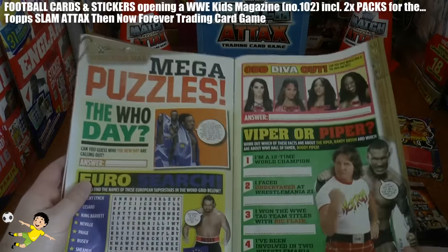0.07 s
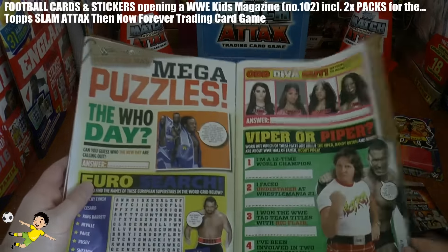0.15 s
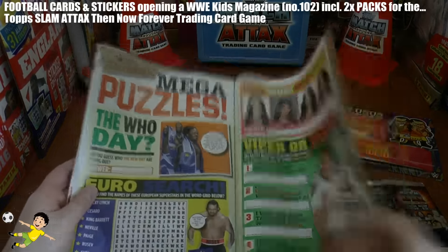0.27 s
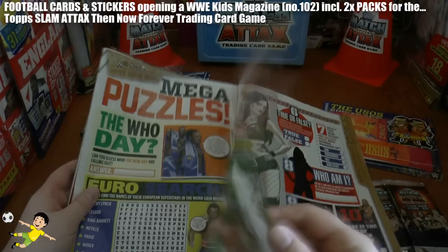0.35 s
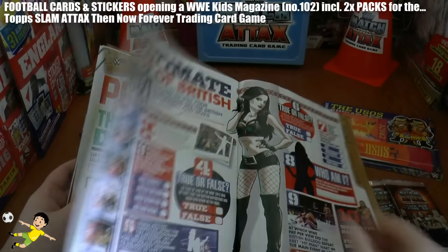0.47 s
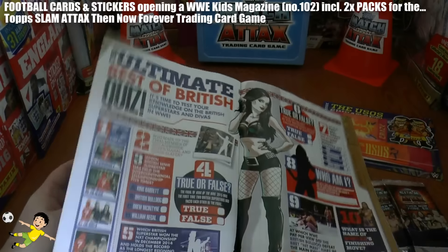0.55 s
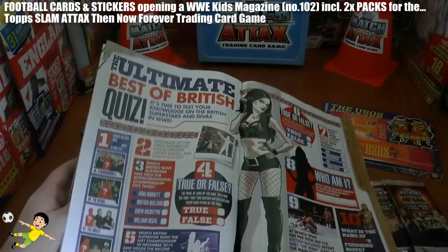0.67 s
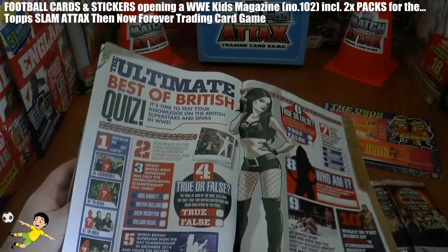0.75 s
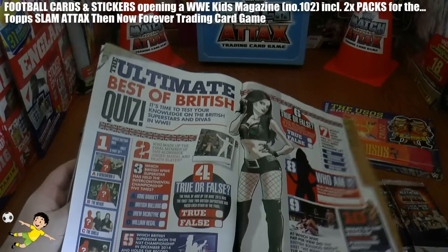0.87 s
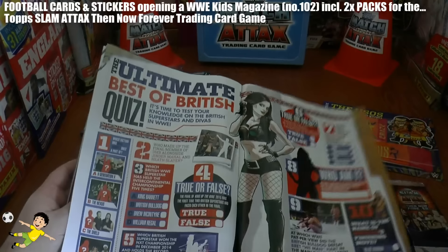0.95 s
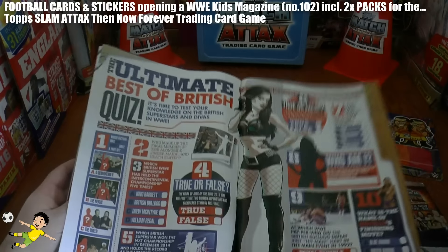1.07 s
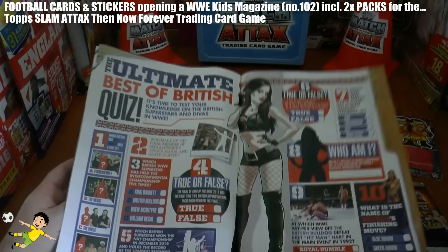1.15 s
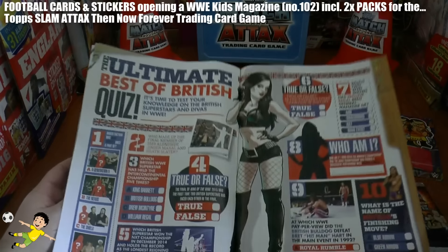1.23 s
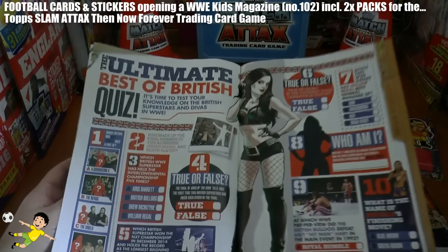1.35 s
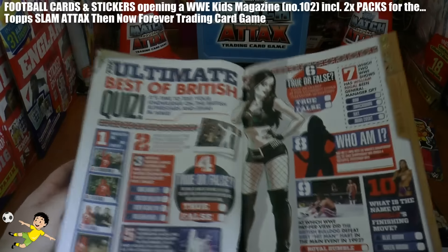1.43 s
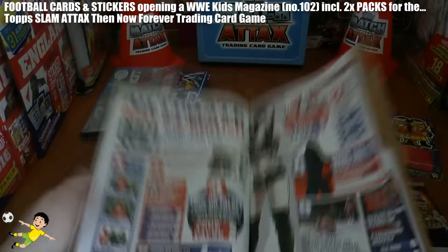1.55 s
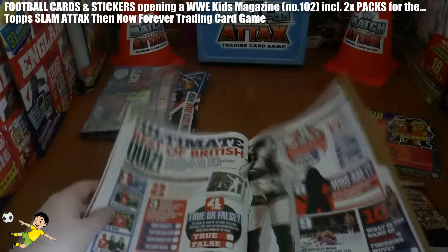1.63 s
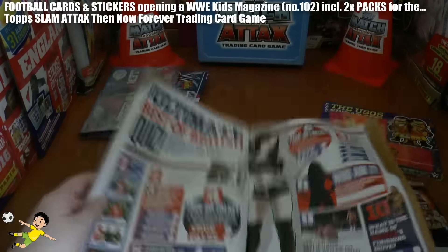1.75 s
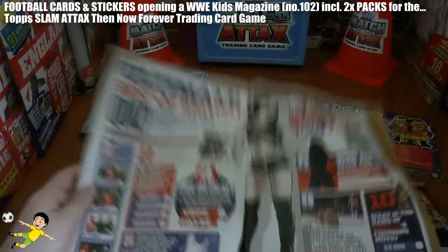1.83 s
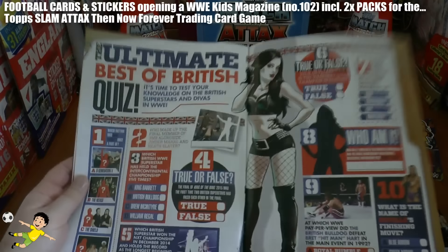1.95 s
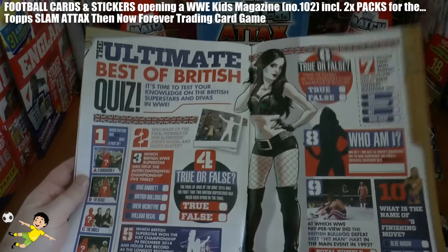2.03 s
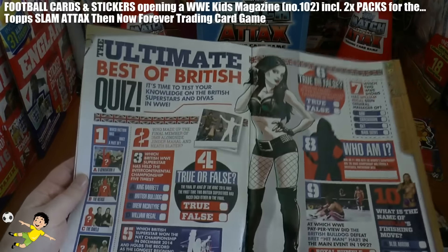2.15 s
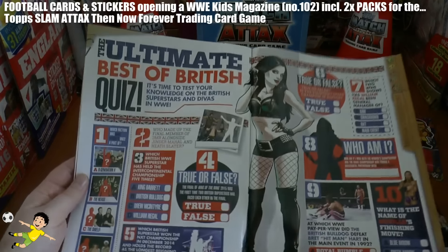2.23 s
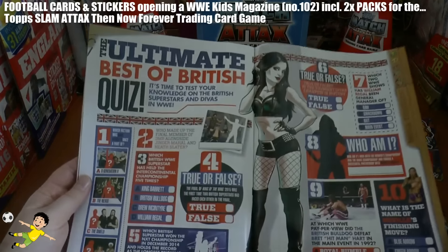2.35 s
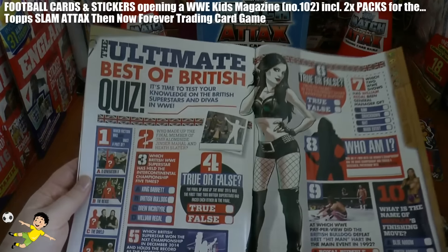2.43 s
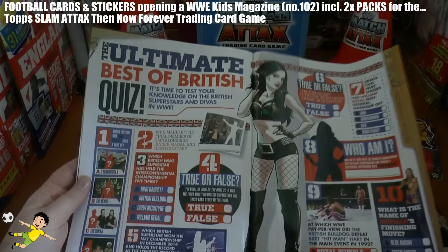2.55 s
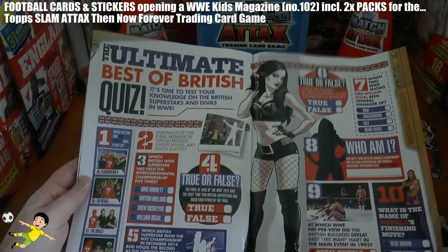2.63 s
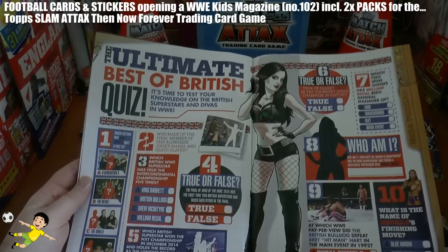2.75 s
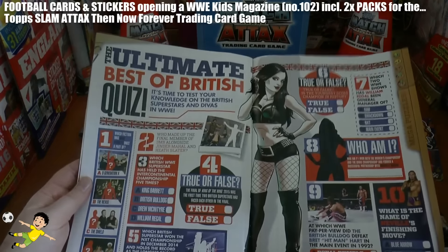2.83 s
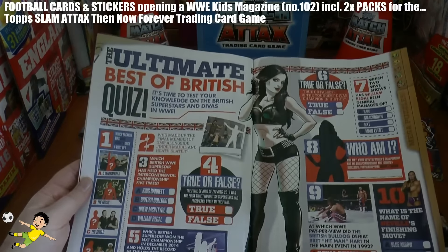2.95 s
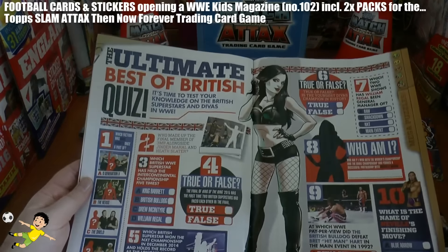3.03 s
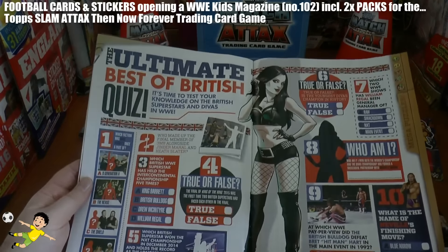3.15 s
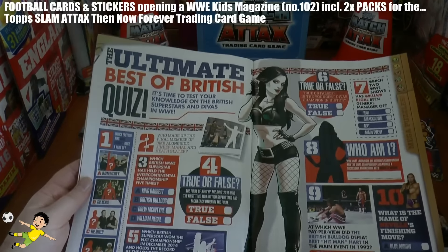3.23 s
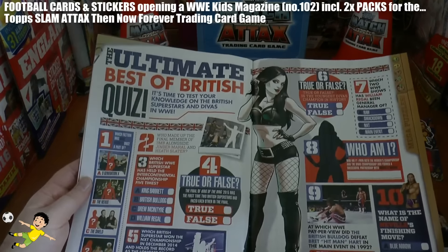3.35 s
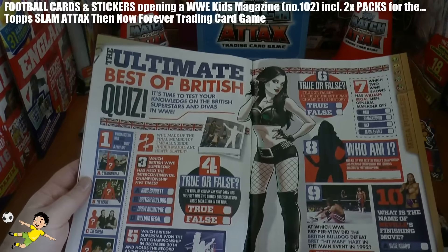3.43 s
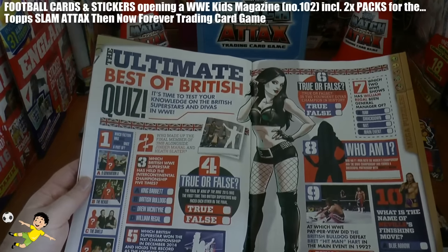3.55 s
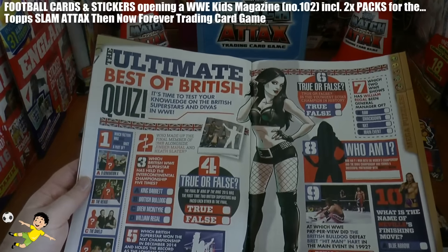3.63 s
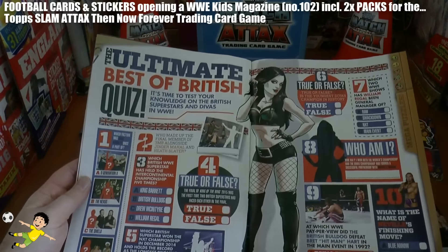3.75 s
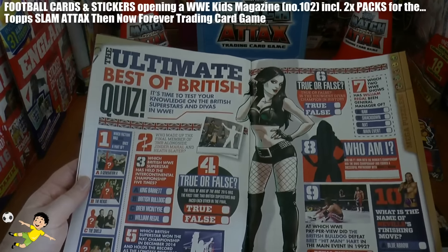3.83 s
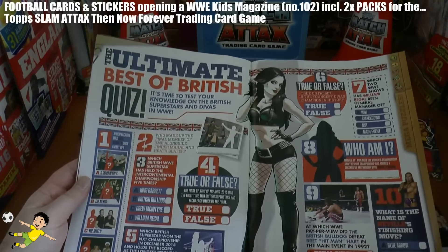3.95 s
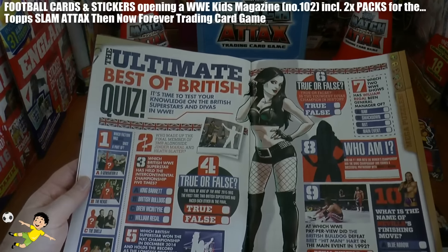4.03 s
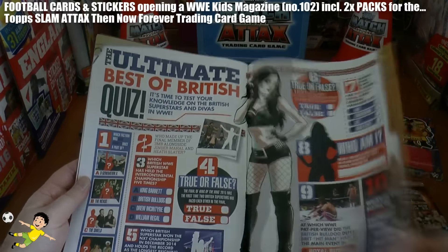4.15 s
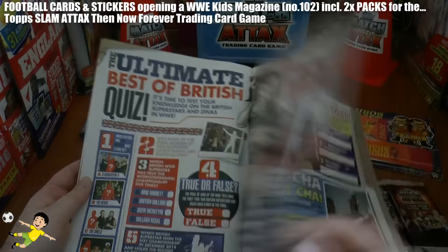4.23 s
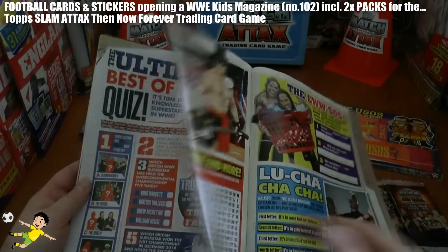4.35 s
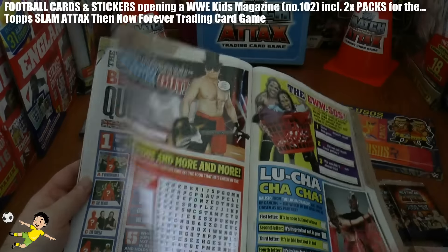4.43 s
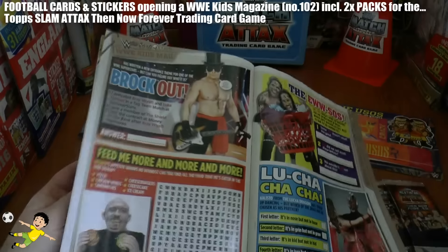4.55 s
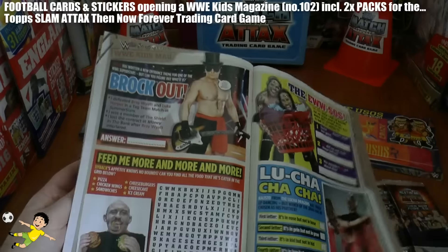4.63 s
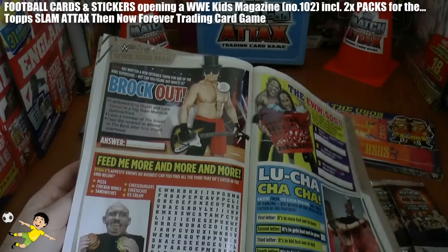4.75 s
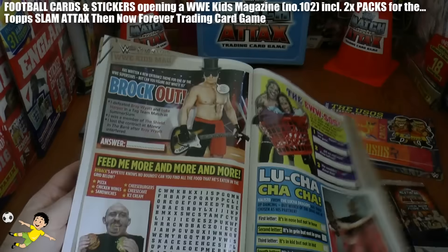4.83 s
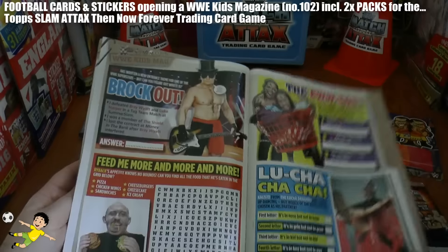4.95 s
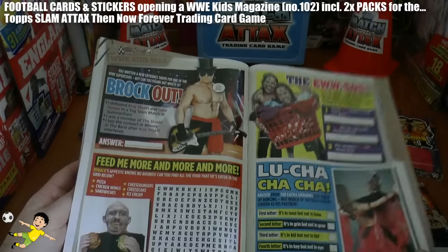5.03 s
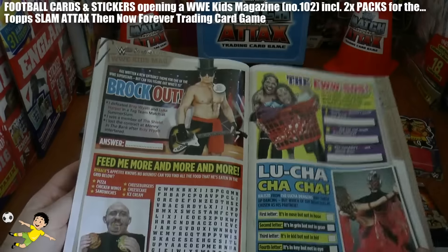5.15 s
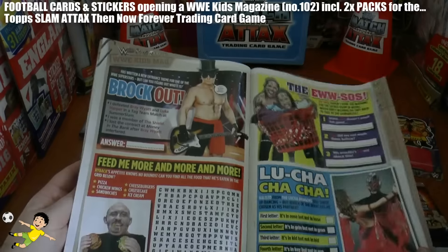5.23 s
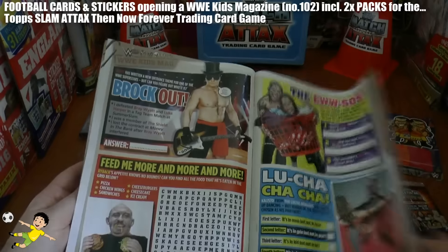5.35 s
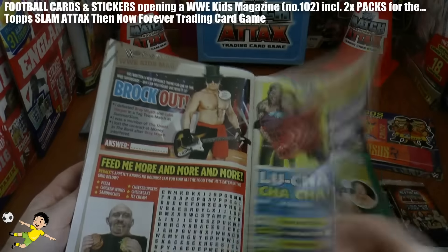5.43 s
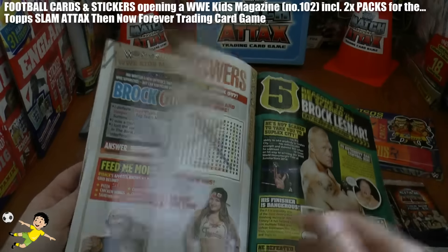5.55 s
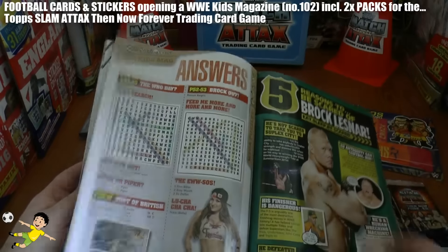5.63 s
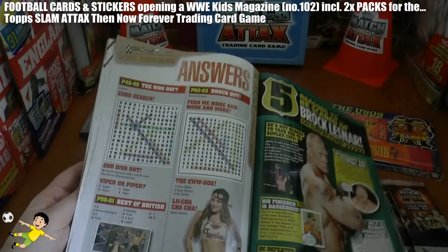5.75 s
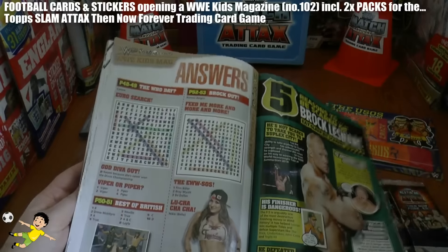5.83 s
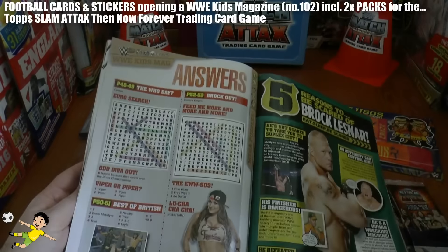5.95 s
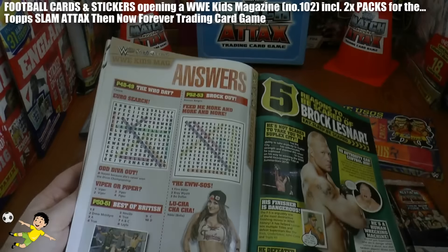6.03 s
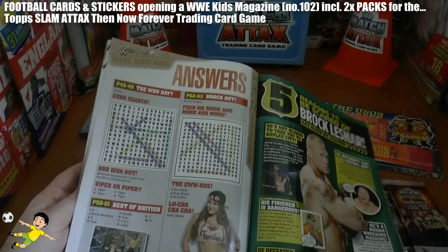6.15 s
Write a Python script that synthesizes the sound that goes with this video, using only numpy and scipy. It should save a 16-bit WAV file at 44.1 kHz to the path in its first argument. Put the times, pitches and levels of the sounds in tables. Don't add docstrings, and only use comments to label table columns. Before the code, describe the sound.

Close paper handling in a small quiet room: bursts of crackling page flips and swishes, a near-silent gap, then two more brisk turns.

```python
import sys
import numpy as np
from scipy import signal
from scipy.fft import rfft, irfft
from scipy.io import wavfile
from scipy.ndimage import uniform_filter1d

SR = 44100
rng = np.random.default_rng(int(sys.argv[2]) if len(sys.argv) > 2 else 0)


def store_wav(level_fs):
    pcm = np.round(np.clip(np.atleast_2d(level_fs), -1, 1) * 32767)
    wavfile.write(sys.argv[1], SR, pcm.T.astype(np.int16))


def gain_from_db(level_db):
    decades = np.asarray(level_db, float) / 20
    return 10 ** decades


N = 272934

# (frequency [Hz], level [dB], t60 [s])
TABLE_MODES = [(98, 2, .1), (245, 0, .07), (337, -2, .07), (432, -7, .06), (580, -14, .04), (800, -12, .04)]


def rms_one(x):
    return x / np.sqrt(np.mean(x ** 2) + 1e-20)


def peak_one(x):
    return x / np.abs(x).max()


def at_hz(points, hz):
    table_hz, values = np.array(points).T[:2]
    return np.interp(np.log(hz + 1), np.log(table_hz), values)


def in_time(rows):
    s, *columns = np.transpose(rows)
    return [np.interp(np.arange(N) / SR, s, column) for column in columns]


def swell(peak_s, db, rise_s, fall_s):
    t = np.arange(N) / SR - peak_s
    return gain_from_db(db - 30 * np.maximum(-t / max(rise_s, .003), t / max(fall_s, .003)))


def band(x, low_hz, high_hz):
    return signal.sosfilt(signal.butter(2, [low_hz, high_hz], "band", fs=SR, output="sos"), x)


def ring(x, hz, t60_s):
    radius = gain_from_db(-60 / (t60_s * SR))
    turn = 2 * np.pi * hz / SR
    return signal.lfilter([0, np.sin(turn)], [1, -2 * radius * np.cos(turn), radius ** 2], x + 1e-18)


def colour(x, spectrum):
    # (centre [Hz], width [Hz], gain [dB])
    housing = [(496, 17, -14.5), (749, 36, 9.5), (935, 70, -12), (1232, 121, -9), (1450, 73, 5),
               (1534, 44, -10.5), (3160, 27, -1.5)]
    hz = np.fft.rfftfreq(8192, 1 / SR)
    db = at_hz(spectrum, hz)
    for centre_hz, width_hz, gain_db in housing:
        db = db + gain_db * np.exp(-.5 * ((hz - centre_hz) / width_hz) ** 2)
    cepstrum = irfft(np.log(gain_from_db(db)))
    cepstrum[1:4096] *= 2
    cepstrum[4097:] = 0
    response = irfft(np.exp(rfft(cepstrum)))
    return signal.fftconvolve(x, response[None], axes=1)[:, :N]


def stereo_noise():
    # (frequency [Hz], side re mid [dB])
    side_level = [(60, -8.5), (350, -6), (800, -10.5), (1300, -12), (6000, -17.5), (8000, -10.5),
                  (9500, -17.5), (16000, -20.5)]
    mid, side = rng.standard_normal((2, N))
    side_gain = gain_from_db(at_hz(side_level, np.fft.rfftfreq(N, 1 / SR)))
    side = irfft(rfft(side) * side_gain, N)
    return mid + side * [[1], [-1]]


def drift(per_s):
    r = np.exp(-2 * np.pi * per_s / SR)
    wander = signal.lfilter([1], [1, -2 * r, r * r], rng.standard_normal(N + SR))
    return rms_one(wander[SR:])


def crackle(per_s, depth_db, smooth, t60_s):
    born = rng.random(N) < per_s * gain_from_db(5 * drift(25)) / SR
    sizes = born * gain_from_db(np.clip(depth_db, 0, 6) * np.minimum(rng.exponential(1, N), 3))
    grains = smooth + signal.lfilter([1], [1, -gain_from_db(-60 / (t60_s * SR))], sizes)
    return grains / np.sqrt(uniform_filter1d(grains ** 2, 2001))


def sheet_bands(grains):
    # (frequency [Hz], density [dB/Hz])
    paper_spectrum = [(24, -29.5), (40, -25.5), (96, -8), (199, -2.5), (337, -3), (503, 0.5), (751, -7.5),
                      (896, 2.5), (1270, 2.5), (1440, 5.5), (2440, 9), (10400, -7), (14500, -20.5),
                      (16000, -31)]
    slopes = [(1000, "low", 3), ([1100, 4200], "band", 1), (4000, "high", 2)]
    bands = []
    for hz, kind, order in slopes:
        sos = signal.butter(order, hz, kind, fs=SR, output="sos")
        paper = colour(grains * stereo_noise(), paper_spectrum)
        bands.append(rms_one(signal.sosfilt(sos, paper)))
    return bands


def background():
    # (frequency [Hz], density [dB/Hz])
    hiss_spectrum = [(30, -7.5), (90, 6), (330, 5.5), (480, -13), (740, -14.5), (1000, -11), (1700, -6.5),
                     (3100, -6), (4200, -7.5), (8800, -27), (9200, -10.5), (12500, -10), (14500, -15),
                     (16000, -29.5)]
    # (frequency [Hz], level [dB rms])
    hum_tones = [(333.8, -76), (726.7, -97.5), (1061, -85), (1394, -86), (1728, -78), (1890, -81),
                 (2401, -87.5), (3128, -80.5)]
    t = np.arange(N) / SR
    tones = sum(gain_from_db(db + 1.0) * np.sin(2 * np.pi * (hz * t + rng.random())) for hz, db in hum_tones)
    hiss = gain_from_db(-67) * rms_one(colour(stereo_noise(), hiss_spectrum))
    return hiss + gain_from_db(2.0 * drift(4)) * tones


def rustle():
    # (time [s], level [dB])
    handling = [(0.0, -49.5), (0.15, -50.5), (0.5, -42.5), (0.81, -52.5), (1.41, -60), (1.81, -40),
                (2.19, -59), (2.55, -48.5), (2.74, -64.5), (2.96, -68.5), (4.21, -76.5), (4.41, -49),
                (4.62, -54), (4.84, -67.5), (5.12, -59), (5.39, -49), (5.52, -49), (6.19, -60)]
    # (peak time [s], level [dB], rise [s], fall [s])
    swings = [(.14, -45.5, 0.031, 0.13), (.42, -35, 0.15, 0.016), (.74, -57, 0.31, 1),
              (1.201, -70, 0.63, 0.14), (1.67, -45, 0.095, 0.22), (2.05, -52, 0.16, 0.19),
              (2.48, -61, 0.21, 0.051), (2.678, -49, 0.15, 0.13), (4.26, -38, 0.082, 0.23),
              (4.43, -46, 0.015, 0.32), (4.69, -68, 0.079, 0.14), (5.55, -37.5, 0.18, 0.21),
              (5.86, -47, 0.073, 0.077)]
    level_db, = in_time(handling)
    mean_effort_db = -55
    flap_db = mean_effort_db - 6 + 0.67 * (level_db - mean_effort_db)
    air = gain_from_db(flap_db) + sum(swell(*row) for row in swings)
    flap, sheet, edge = sheet_bands(crackle(580, (level_db + 50) / 2.8, 1.5, 0.009))
    flicker = gain_from_db(0.46 * drift(54))
    gusts = gain_from_db(2.5 * drift(12))
    friction = gain_from_db(level_db) * sheet + gain_from_db(level_db - 5) * edge
    return flicker * friction + air * gusts * flap


def room(x):
    # (frequency [Hz], t60 [s])
    room_t60 = [(200, 0.29), (1400, 0.17), (4000, 0.098), (12000, 0.049)]
    t = np.arange(SR // 2) / SR
    shared = rng.standard_normal(len(t))
    own = rng.standard_normal((2, len(t)))
    tail = 0
    for low_hz in 60 * 2 ** np.arange(8.0):
        decay = gain_from_db(-60 * t / at_hz(room_t60, 0.34 * low_hz))
        tail = tail + band(shared + 0.58 * own, low_hz, 2 * low_hz) * decay
    tail *= t > .004
    tail = tail / np.sqrt(np.sum(tail ** 2) / 2)
    return signal.fftconvolve(x, tail, axes=1)[:, :N]


def snaps():
    # (time [s], peak [dB], ring [Hz], treble re peak [dB])
    slip_events = [(0.028, -24.5, 2350, 0), (0.2798, -12.5, 2640, -2), (.345, -17.5, 2000, -20),
                   (0.4056, -5.5, 2720, -7), (.4186, -6.5, 2934, 0), (0.743, -27.5, 3550, -17),
                   (1.052, -22.5, 3470, -18), (1.1998, -26, 1720, -10.5), (1.4994, -28, 2060, -41),
                   (1.9396, -17.5, 3500, -8), (2.1032, -26, 2100, -7), (2.5247, -27, 4600, -2),
                   (3.5354, -43.5, 2230, -3), (4.14, -46, 2050, -15), (4.475, -22, 1670, -23),
                   (4.5352, -19, 1650, -47), (4.6461, -23.5, 2340, -10), (5.014, -37, 3130, -9),
                   (5.3954, -18, 2220, -5), (5.466, -21.5, 3420, -22), (5.5505, -4.5, 2390, -11),
                   (5.5895, -9.5, 2970, -12)]
    # (time [s], peak [dB], ring [Hz], treble re peak [dB])
    crack_events = [(0.13, -17, 2430, -1), (0.6496, -14, 3660, -7), (1.8435, -20, 2400, 5),
                    (1.915, -19, 3070, -13), (1.9969, -19, 2290, -7), (2.2463, -17, 2310, -5),
                    (2.365, -13.5, 2080, -1), (2.4095, -10, 2080, -7.5), (2.4609, -13.5, 2090, -1.5),
                    (2.6471, -10, 3550, 0.5), (2.7582, -33, 2280, -16.5), (3.123, -34, 2090, -36),
                    (3.4532, -44, 2170, -34), (3.5997, -45.5, 2210, -6), (3.7177, -39.5, 2230, 3.5),
                    (4.1716, -43.5, 2023, -24), (4.2487, -9, 2550, -11), (4.2614, -12, 1870, -18),
                    (4.311, -9, 2460, 3), (4.356, -15, 2200, -10), (4.6324, -28.5, 1920, -15),
                    (5.188, -25.5, 2940, 2.5), (5.3387, -18, 3700, -7), (5.6117, -6, 3640, -16)]
    # (time [s], peak [dB], ring [Hz], treble re peak [dB])
    fold_events = [(0.5034, -9, 2640, -20), (0.612, -14, 1860, -11), (0.7102, -21, 2280, -18),
                   (1.366, -21, 1450, -19), (1.558, -23, 1460, -3), (1.62, -21, 1970, -4),
                   (1.6269, -13.5, 1920, -26), (1.6768, -18.5, 2170, -16), (1.7084, -19, 3180, -24),
                   (1.7173, -2.5, 2290, 1.5), (1.821, -20.5, 3160, -19), (1.894, -29, 3120, 12),
                   (2.051, -23, 3150, -3), (2.428, -25, 2130, -22), (2.6213, -24, 1830, -10),
                   (2.7237, -33.5, 1690, -18), (3.889, -44, 1865, -31), (4.216, -30.5, 2790, -6.5),
                   (4.229, -31, 2310, -0.5), (4.2835, -11, 1920, -15), (4.2972, -4.5, 2850, -23),
                   (4.595, -34.5, 4300, -13), (4.607, -25, 1770, -43), (4.836, -31, 2700, -25),
                   (5.5022, -9, 3100, -1), (5.774, -29, 1830, -20), (5.833, -22, 2760, -4),
                   (6.163, -32.5, 2900, 1.5)]
    # (t60 [s], share [0-1])
    spray_kinds = [(0.11, 0.16), (0.036, 0.52), (0.05, 0.99)]
    length = 4000
    out = np.zeros((2, N + length))
    t = np.arange(length) / SR
    events = []
    for kind, spray_kind in zip([crack_events, fold_events, slip_events], spray_kinds):
        events += [row + spray_kind for row in kind]
    for s, peak_db, hz, treble_db, t60_s, share in events:
        pan, *spray = rng.standard_normal(length + 1)
        share = np.clip(share, .05, 1)
        click_decay = gain_from_db(-60 * t / 0.0039)
        spray_decay = gain_from_db(-60 * t / max(t60_s, .004))
        burst = spray * ((1 - share) * click_decay + share * spray_decay)
        burst[0] = 0.24 * (1 - share)
        reach_hz = np.clip(5000 * gain_from_db(0.11 * treble_db), 2600, 7000)
        ringing = peak_one(band(ring(burst, hz, 7.5 / hz), 500, 7300))
        body = peak_one(band(band(burst, 700, reach_hz), 700, 1.17 * reach_hz))
        bright = gain_from_db(treble_db - 6.5) * peak_one(band(burst, 3000, 10900))
        sound = 0.46 * (peak_one(ringing + body) + bright)
        pan_db = 1.7 * pan - .6
        at = int(s * SR)
        out[:, at:at + length] += gain_from_db(peak_db) * sound * gain_from_db([[pan_db], [-pan_db]])
    return colour(out[:, :N] + pips(), [(100, -25.0), (900, 1.5), (9000, 6.0), (16000, -3.5)])


def slides():
    # (time [s], frequency [Hz], level [dB])
    glides = [
        [(.03, 2413, -60), (.045, 2350, -53), (.085, 2100, -47), (.113, 1920, -37), (.13, 1980, -45)],
        [(5.195, 2853, -54), (5.225, 2822, -46), (5.26, 2450, -48), (5.29, 2200, -46), (5.335, 2180, -50)],
    ]
    slow = signal.butter(2, 650 / 2, fs=SR, output="sos")
    out = 0
    t = np.arange(N) / SR
    for rows in glides:
        hz, db = in_time(rows)
        phase = 2 * np.pi * np.cumsum(hz) / SR
        a, b = signal.sosfilt(slow, rng.standard_normal((2, N)))
        inside = (t > rows[0][0]) * (t < rows[-1][0])
        out = out + inside * gain_from_db(db) * rms_one(a * np.sin(phase) + b * np.cos(phase))
    return out


def pips():
    # (time [s], peak [dB], ring [Hz])
    buckles = [(.0872, -30, 2020), (0.1122, -25, 2300), (0.116, -37, 1900), (.1354, -38, 2400),
               (.614, -20, 4100), (.1504, -25, 2580), (0.157, -28, 3200), (0.176, -27, 2500),
               (0.192, -34, 2510), (.2249, -29, 1860), (0.2768, -19, 2540), (.3202, -26, 2110),
               (0.3332, -25, 2800), (.3495, -24, 6500), (.555, -27, 7000), (.3895, -17, 2490),
               (.4314, -15, 5200), (0.4946, -18, 5000), (.6112, -22.5, 7000), (0.754, -24.5, 3420),
               (1.3924, -39, 1950), (1.5046, -26.5, 4900), (3.5365, -46.5, 2150), (1.664, -24, 2000),
               (1.6862, -32, 2020), (1.7007, -28, 2450), (1.8307, -28, 3100), (1.8632, -39, 2730),
               (1.88, -38, 2880), (1.9077, -20, 2920), (1.9261, -26, 3010), (1.966, -29, 2670),
               (1.9774, -26, 3570), (1.984, -28, 3630), (2.1284, -38, 3700), (2.2302, -34, 2130),
               (2.3713, -30, 2520), (2.3978, -26, 3220), (2.414, -29, 1500), (2.4674, -25, 2670),
               (2.6517, -22.5, 4900), (2.6752, -30, 3000), (2.6998, -35, 2320), (4.1519, -42.5, 1980),
               (5.5901, -12, 2770), (4.272, -30, 7000), (.6485, -18.5, 7500), (4.5458, -24.5, 4460),
               (4.664, -33, 2020), (4.6833, -27.5, 2130), (5.0492, -38.5, 3200), (5.291, -30, 2020),
               (5.3025, -33, 2360), (5.591, -10, 6500), (5.4423, -27, 2110), (5.46, -22.5, 1930),
               (5.4773, -19, 1930), (5.5975, -12, 2710), (5.7568, -30, 1880), (5.7995, -41, 2110)]
    # (time [s], peak [dB], ring [Hz])
    crinkles = [(0.0612, -34, 1960.0), (0.0699, -38.0, 2450.0), (0.1156, -30, 1810.0),
                (0.1415, -29.0, 2130.0), (0.3234, -26, 2150.0), (0.3836, -25.0, 2240.0),
                (0.4024, -17, 2480.0), (0.4192, -7, 3530.0), (0.4539, -28, 2560.0), (0.5044, -11, 2580.0),
                (0.5319, -17, 2710.0), (0.542, -17, 2730.0), (0.5783, -27.0, 2800.0), (0.7313, -25, 2580.0),
                (1.5002, -22.5, 2030), (1.5799, -34, 1740.0), (1.6177, -27, 1850.0), (1.6245, -18, 2280.0),
                (1.6398, -34, 2330.0), (1.6484, -33, 2090.0), (1.6574, -30.0, 2050.0),
                (1.6699, -33.0, 2050.0), (1.7092, -22.0, 3230.0), (1.7564, -27.0, 2860.0),
                (1.7859, -26, 2000.0), (1.8619, -32.0, 2370.0), (2.0068, -30, 3040.0),
                (2.0345, -37.0, 2860.0), (2.0801, -32, 2860.0), (2.2349, -35, 2170.0),
                (2.2488, -32, 2130.0), (2.4157, -32, 1700.0), (2.4189, -32.0, 2000.0),
                (2.5009, -37.0, 2110.0), (2.6161, -33, 2390.0), (4.2248, -32, 2610.0),
                (4.2345, -27.0, 2500.0), (4.2875, -15, 1830.0), (4.3103, -11, 1930), (4.3594, -17, 2450.0),
                (4.3633, -15, 2110.0), (4.4322, -30.0, 2240.0), (4.4408, -22, 2800.0), (4.4555, -33, 3100),
                (4.4995, -34, 2710.0), (4.5955, -39, 4330.0), (4.7083, -30, 2280.0), (5.0137, -45, 3270.0),
                (5.4053, -30, 1770.0), (5.4105, -28, 2370.0), (5.4387, -34.0, 1980.0),
                (5.4869, -28, 1790.0), (5.493, -32, 2480.0), (5.5359, -20, 1960.0), (5.6676, -17, 1980.0),
                (5.6762, -33, 2800.0), (5.8071, -39.0, 3140.0), (5.8459, -35.0, 2280.0)]
    length = 900
    out = np.zeros((2, N + length))
    t = np.arange(length) / SR
    for s, peak_db, hz in buckles + crinkles:
        pan, *spray = rng.standard_normal(length + 1)
        burst = spray * gain_from_db(-60 * t / .008)
        click = peak_one(band(burst, 1700, 5500))
        sound = peak_one(ring(burst, hz, 10 / hz)) + .3 * click
        at = int(s * SR)
        out[:, at:at + length] += gain_from_db(peak_db - 4.5) * sound * gain_from_db([[pan], [-pan]])
    return out[:, :N]


def ticks():
    sizes = gain_from_db(5 * np.minimum(rng.exponential(1, N), 3))
    sizes = sizes * (rng.random(N) < 260 * gain_from_db(6 * drift(30)) / SR)
    dealt = rng.integers(0, 10, N)
    pitches_hz = np.geomspace(1500, 8000, 10)
    return rms_one(sum(ring(sizes * (dealt == k), hz, 31.0 / hz) for k, hz in enumerate(pitches_hz)))


def sweeps():
    # (peak time [s], sheet [dB], rise [s], fall [s], edge re sheet [dB])
    page_sweeps = [(0.136, -47.5, 0.1, 0.45, 9.5), (0.371, -27, 0.11, 0.099, -36),
                   (0.418, -17, 0.021, 0.075, 6), (0.506, -19.5, 0.084, 0.13, -7.5),
                   (.82, -57.5, 0.42, 0.18, 15.5), (0.978, -56, 0.092, 0.18, 18),
                   (1.508, -42, 0.055, 0.21, 2), (1.721, -22.5, 0.023, 0.09, -1.5), (1.9, -51, 0.097, 1, 1),
                   (2.247, -31.5, 0.0079, 0.06, 0.5), (2.52, -55, 0.091, 0.33, 11),
                   (2.655, -43, 0.076, 0.12, 5.5), (3.182, -62, 0.052, 0.14, -2.5),
                   (4.26, -27, 0.058, 0.16, -37), (4.311, -15, 0.04, 0.046, 3),
                   (4.357, -18.5, 0.018, 0.096, 0), (4.492, -28.5, 0.044, 0.095, -35),
                   (4.82, -49.5, 1, 0.19, -0.5), (5.11, -53, 0.11, 0.082, 8), (5.192, -42, 0.0079, 0.43, 2),
                   (5.591, -18.5, 0.0086, 0.17, -5.5), (5.505, -16, 0.01, 0.076, -9),
                   (5.551, -20, 0.0079, 0.097, 6), (5.614, -26, 0.014, 0.071, 9.5)]
    # (peak time [s], sheet [dB], rise [s], fall [s], edge re sheet [dB])
    further_sweeps = [(5.895, -42.5, 0.13, 0.067, 5), (6.05, -48, 0.23, 0.045, 2),
                      (6.17, -52.5, 0.015, 0.067, 7.5), (5.345, -49.5, 0.065, 0.23, 12),
                      (1.64, -35, .02, 0.154, -7.5), (4.445, -37, .06, 0.049, -12)]
    flap, sheet, edge = sheet_bands(crackle(900, 2.4, 2.8, 0.005))
    body = bright = 0
    for s, db, rise_s, fall_s, edge_db in page_sweeps + further_sweeps:
        body = body + swell(s, db, rise_s, fall_s)
        bright = bright + swell(s, db + edge_db, 0.78 * rise_s, 0.93 * fall_s)
    swish = sheet + gain_from_db(-16) * ticks() + gain_from_db(-16.5) * flap
    return gain_from_db(-4.0) * (body * swish + bright * edge)


def thumps():
    # (time [s], peak [dB], pitch [Hz], t60 [s])
    landings = [(0.275, -19.5, 192, 0.016), (0.407, -14.5, 770, 0.0046), (.688, -32, 288, 0.028),
                (0.699, -22.5, 267, 0.14), (0.704, -19, 109, 0.079), (1.497, -29.5, 790, 0.0043),
                (1.6177, -10, 394, 0.01), (1.624, -23, 140, 0.13), (5.842, -25.5, 349, 0.05),
                (1.709, -22, 305, 0.11), (1.7183, -4.5, 748, 0.046), (2.245, -36.5, 447, 0.1),
                (2.408, -33.5, 216, 0.022), (2.647, -28.5, 230, 0.036), (3.124, -36.5, 698, 0.013),
                (4.2304, -16.5, 448, 0.013), (4.287, -17, 680, 0.061), (4.424, -22.5, 191, 0.032),
                (4.641, -26.5, 300, 0.02), (4.74, -38, 100, 0.15), (4.648, -19, 99, 0.041),
                (5.393, -24.5, 750, 0.053), (5.548, -19.5, 706, 0.046), (5.832, -19.5, 257, 0.13),
                (5.837, -17.5, 104, 0.071), (5.884, -29.5, 246.3, 0.15), (6.165, -31, 109, 0.13),
                (2.364, -36, 302, 0.016), (2.431, -32, 220, .03), (2.461, -32.5, 350, .02),
                (4.4245, -26.5, 358.3, 0.028), (4.647, -29, 617, 0.037), (4.657, -27, 338, 0.036),
                (4.84, -39.5, 790, .04)]
    length = 9000
    out = np.zeros(N + length)
    t = np.arange(length) / SR
    for s, peak_db, hz, t60_s in landings:
        strengths_db = rng.normal(0, 0.39, len(TABLE_MODES))
        puff = rng.standard_normal(length)
        push = np.exp(-.5 * ((t - 0.13 / hz) * hz / 0.027) ** 2)
        push = push + 0.011 * puff * gain_from_db(-60 * t / 0.011)
        table = 0
        for (mode_hz, db, decay_s), strength_db in zip(TABLE_MODES, strengths_db):
            lightness = min(1, mode_hz / hz) ** 1.3
            table = table + gain_from_db(db + strength_db) * lightness * ring(push, mode_hz, decay_s)
        sheet = ring(push, hz, np.clip(t60_s, .005, 32 / hz))
        sound = peak_one(sheet + 0.27 * table)
        sound += 0.3 * peak_one(band(puff * gain_from_db(-60 * t / 0.099), 100, 830))
        at = int(s * SR)
        out[at:at + length] += gain_from_db(peak_db - 5.0) * sound
    out = out[:N]
    return out * gain_from_db([[-.6], [.6]]) + 0.15 * np.gradient(out, 12) * [[12], [-12]]


def rumble():
    # (peak time [s], level [dB], rise [s], fall [s])
    jolts = [(1.72, -38, 0.029, 0.19), (.63, -58, .05, .1), (2.04, -59.5, 0.047, 0.17),
             (4.36, -56, 0.04, .15), (5.6, -56, .1, 0.11), (5.75, -58, .05, .1)]
    noise = stereo_noise() + 1.2 * rng.standard_normal(N)
    return rms_one(band(noise, 13, 55)) * sum(swell(*row) for row in jolts)


def drags():
    # (peak time [s], level [dB], rise [s], fall [s])
    rubs = [(.77, -48, 0.18, 0.08), (4.765, -47, .25, 0.09), (5.9, -53, .1, 0.12), (6.06, -50, 0.09, 0.1)]
    white = rng.standard_normal(N + 1)
    noise = np.diff(white) + .09 * white[1:]
    table = sum(gain_from_db(db) * ring(noise, hz, t60_s) for hz, db, t60_s in TABLE_MODES)
    return rms_one(table) * sum(swell(*row) for row in rubs)


def squeak():
    # (time [s], frequency [Hz], level [dB])
    finger_tracks = [
        [(1.06, 6850, -75), (1.12, 6750, -64), (1.235, 6770, -64), (1.27, 6700, -80)],
        [(1.24, 5800, -80), (1.265, 5630, -63), (1.31, 5250, -64), (1.39, 4000, -70)],
    ]
    out = 0
    t = np.arange(N) / SR
    for rows in finger_tracks:
        hz, db = in_time(rows)
        inside = (t > rows[0][0]) & (t < rows[-1][0])
        phase = 2 * np.pi * np.cumsum(hz + 45 * drift(170)) / SR
        out = out + inside * gain_from_db(db + 2 * drift(68)) * np.sin(phase)
    return out


def gaps():
    # (peak time [s], level [dB], rise [s], fall [s], centre [Hz])
    openings = [(4.73, -46, .12, .09, 2200), (4.497, -38, .05, .04, 2800), (1.92, -39, .06, .06, 2900)]
    noise = crackle(300, 2.0, 1.5, .012) * stereo_noise()
    half_width_hz = 280
    out = 0
    for *shape, hz in openings:
        out = out + swell(*shape) * rms_one(band(noise, hz - half_width_hz, hz + half_width_hz))
    return out


def whistle():
    # (centre [Hz], level [dB])
    whistle_bands = [(2830, -77), (3130, -78)]
    t = np.arange(N) / SR
    noise = stereo_noise()
    open_gap = uniform_filter1d(1. * (t > 2.75) * (t < 3.89), 801) * gain_from_db(2 * drift(5))
    half_width_hz = 85
    air = sum(gain_from_db(db) * rms_one(band(noise, hz - half_width_hz, hz + half_width_hz))
              for hz, db in whistle_bands)
    return open_gap * air


def scene():
    paper = rustle() + snaps() + slides() + sweeps() + thumps()
    paper = paper + drags() + squeak() + gaps() + whistle()
    high_pass = signal.butter(4, 84, "high", fs=SR, output="sos")
    paper = signal.sosfilt(high_pass, paper) + gain_from_db(-41.0) * paper
    paper = paper * gain_from_db([[-.25], [.25]])
    return paper + gain_from_db(-14) * room(paper) + rumble() + background()


def low_pass(x):
    return signal.sosfilt(signal.butter(12, 16510, fs=SR, output="sos"), x)


def record(dry):
    rounded = .7 * np.tanh(dry / .7)
    cut = signal.sosfilt(signal.cheby2(12, 40, 16350, fs=SR, output="sos"), rounded)
    return low_pass(cut)


dry = scene()
out = record(dry)
store_wav(out)
```